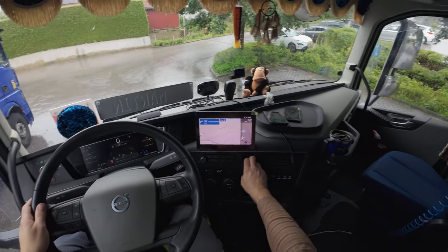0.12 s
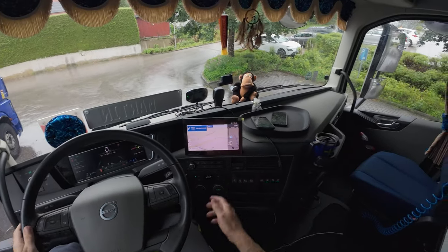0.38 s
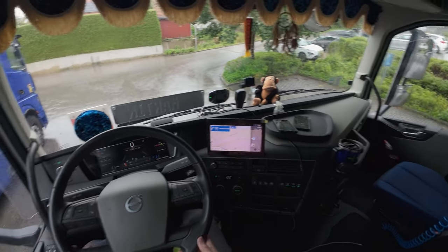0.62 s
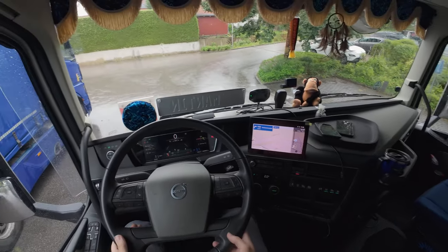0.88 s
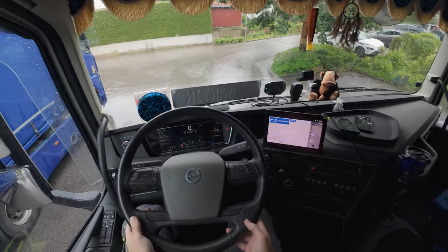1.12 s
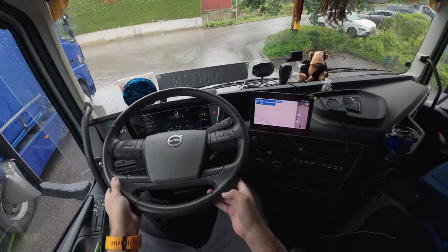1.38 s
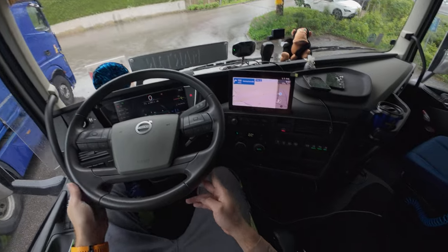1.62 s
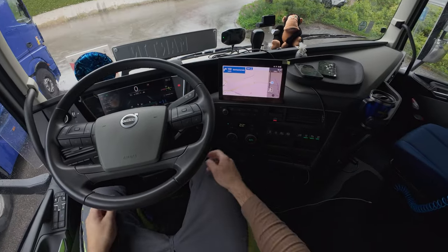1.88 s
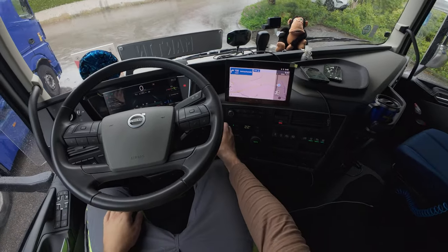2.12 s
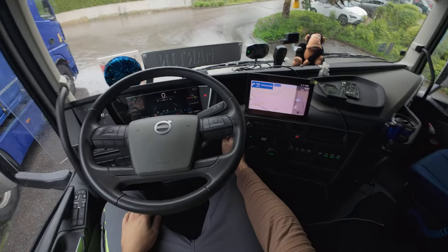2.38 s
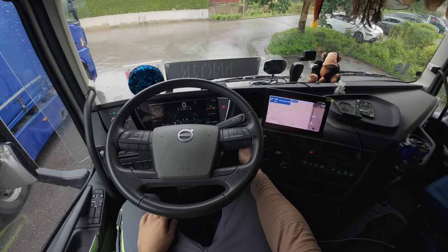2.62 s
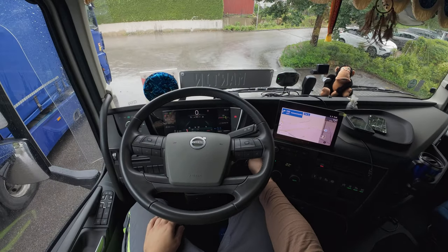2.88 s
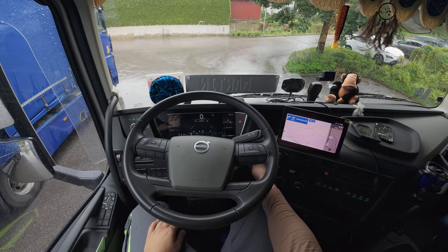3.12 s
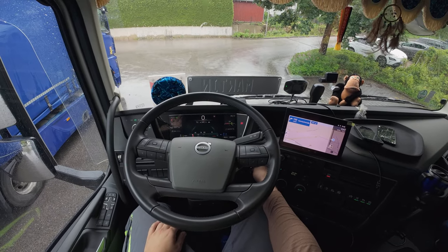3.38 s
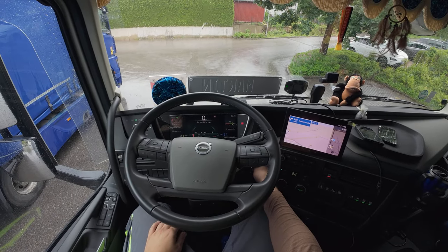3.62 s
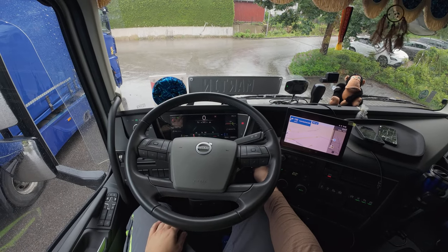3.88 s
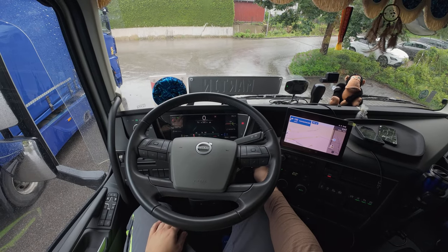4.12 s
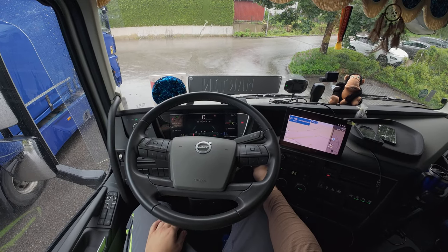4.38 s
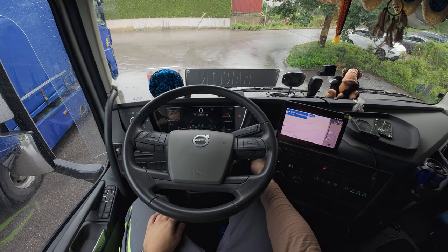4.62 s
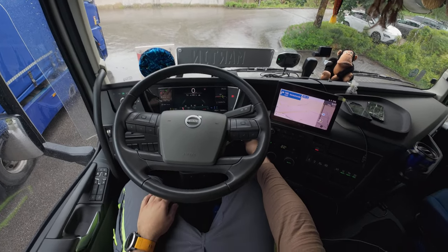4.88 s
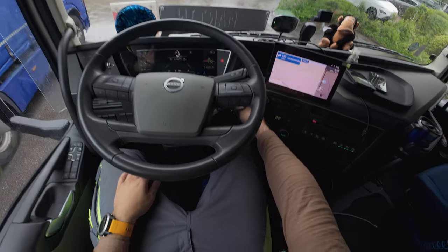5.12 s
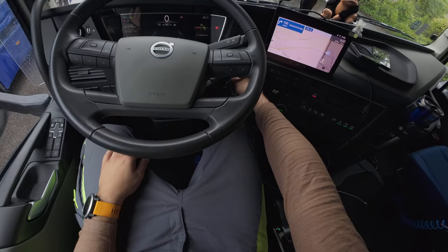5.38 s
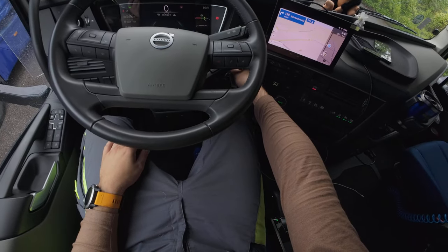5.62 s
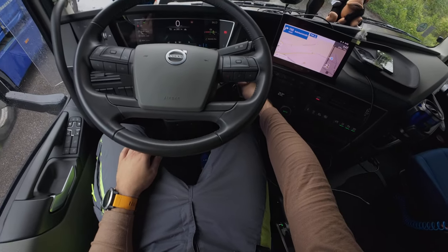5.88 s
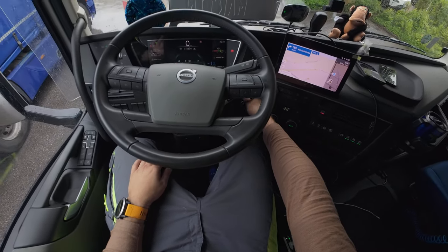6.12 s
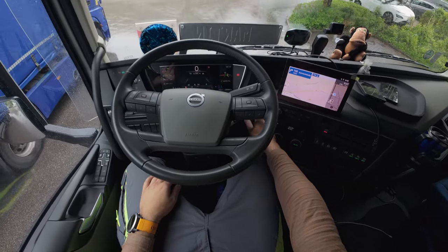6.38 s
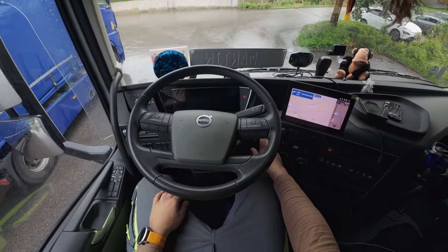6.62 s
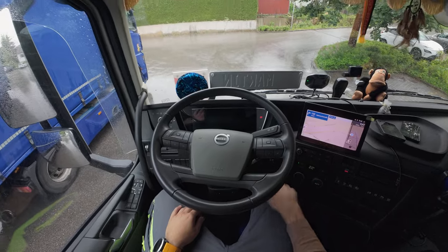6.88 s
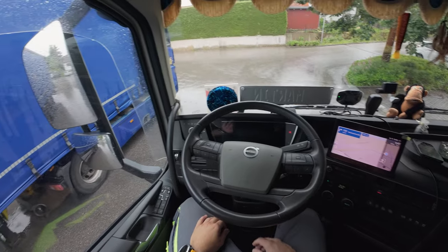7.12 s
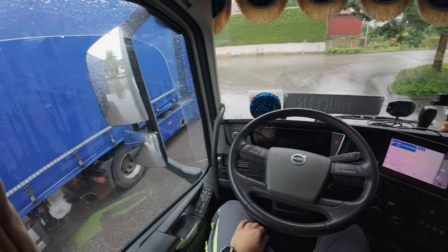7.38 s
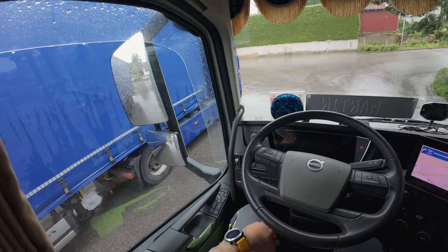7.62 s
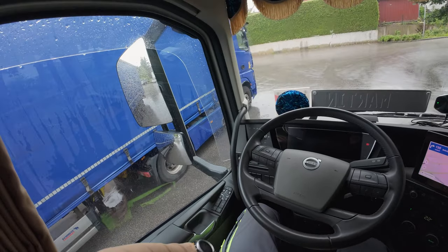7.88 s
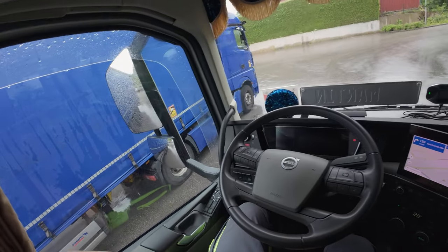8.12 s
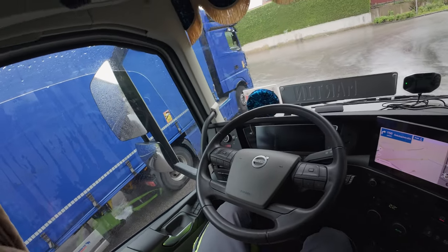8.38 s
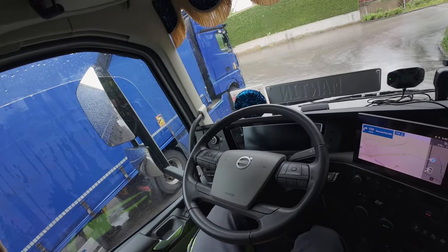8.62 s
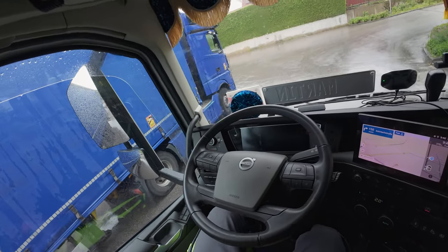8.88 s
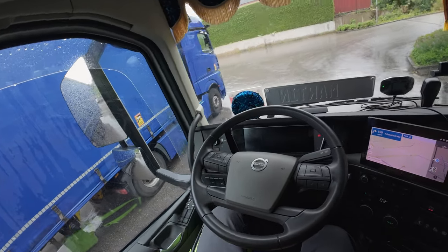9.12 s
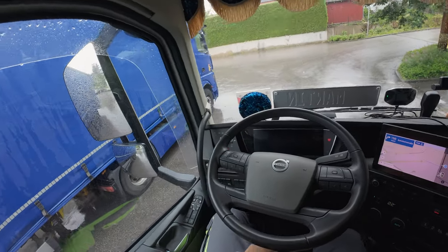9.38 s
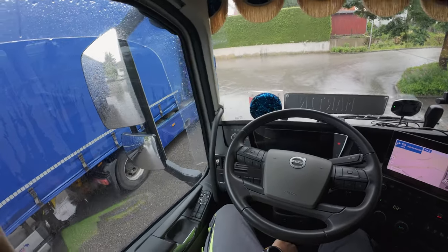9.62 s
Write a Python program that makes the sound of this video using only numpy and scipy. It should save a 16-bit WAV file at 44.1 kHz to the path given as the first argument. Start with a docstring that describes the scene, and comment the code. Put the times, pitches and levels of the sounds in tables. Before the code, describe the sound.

Heard in stereo at the driver's head inside a closed, dry truck cab. From 0 s a diesel drums at a slightly fast idle, low and muffled with soft clatter. Small plastic switch clicks come at 0.1 and 0.3 s. At 0.6 s a valve knocks and a bright air jet spits, hissing and fading until about 1.1 s, when a sharp puff starts a second hiss that thins out by about 2 s. Hard steering-column clacks ratchet between 1.15 and 1.65 s, with panel thuds. The engine settles to lower idle by 2 s and runs evenly, with a barely audible high whine. A crisp click lands at 6.1 s, tiny ones at 6.45. From 6.5 s the engine glides down, shaking the cab around 7 s, and stops near 8.4. Faint cloth rustles, low seat bumps and trim ticks follow, strongest near 8.7 s, then near silence.

```python
"""A fast diesel idle drums under a quiet truck cab, built from crank-order sines and shaped noise.
Switches click, air jets from a valve and the steering column ratchets, as noise and damped resonances.
The engine drops to idle; near 6.5 s it is switched off, its orders gliding down as it shudders to rest.
Cloth rustles as grainy noise and low lumps and seat bumps follow while the driver shifts in the seat.
Two ports near the driver's head hear each noise with frequency-dependent likeness, level and phase."""
import sys
import numpy as np
from scipy import signal
from scipy.io import wavfile
from scipy.ndimage import uniform_filter1d

SR = 44100
rng = np.random.default_rng(int(sys.argv[2]) if len(sys.argv) > 2 else 0)


def bounce(signal):
    """Save signal as a 16-bit WAV file at the path given by the first command-line argument."""
    frames = np.transpose(np.atleast_2d(signal))
    limited = np.clip(frames, -1, 1)
    pcm = np.round(limited * 32767).astype(np.int16)
    wavfile.write(sys.argv[1], SR, pcm)


def decibels_to_gain(level_db):
    """Convert a level in decibels to a linear amplitude gain (20 dB per decade)."""
    exponent = np.asarray(level_db, float) / 20
    return 10 ** exponent


N = 429958  # samples


def evened(x):
    """Normalization: scales a signal to rms 1."""
    return x / np.sqrt(np.mean(x ** 2) + 1e-20)


def read(points, hz):
    """Log-frequency interpolation of a spectrum table."""
    f, value = np.transpose(points)
    return np.interp(np.log(hz + 1), np.log(f + 1), value)


def curve(rows):
    """Linear interpolation in time: each table column, one value a sample."""
    s, *columns = np.transpose(rows)
    return [np.interp(np.arange(N) / SR, s, c) for c in columns]


def drift(rate_hz):
    """Random-phase superposition: slow sines up to rate_hz make a wandering of rms 1."""
    t = np.arange(0, N + 64, 64) / SR
    rates = rate_hz * np.geomspace(.05, 1, 16)
    waves = sum(np.sin(2 * np.pi * (f * t + rng.random())) / np.sqrt(f) for f in rates)
    return np.interp(np.arange(N) / SR, t, evened(waves))


def hump(peak_s, rise_s, fall_s):
    """Exponential growth and decay: gain 1 at the peak, 20 dB down after the rise or fall time."""
    t = np.arange(N) / SR - peak_s
    return decibels_to_gain(20 * np.where(t < 0, t / rise_s, -t / fall_s))


def resonate(x, hz, width):
    """Damped resonance: one complex pole, with gain about 1 at its centre."""
    pole = np.exp((2j * np.pi * hz - np.pi * width) / SR)
    return 2 * signal.lfilter([1 - abs(pole)], [1, -pole], x).real


# Likeness of the two ports in a diffuse field. Each row: frequency in Hz, left-right likeness from 0 to 1.
LIKENESS = [(60, 0.99), (600, 0.98), (1400, 0.91), (3000, 0.76), (7000, 0.26), (15000, 0.49)]
# Phase between the ports. Each row: frequency in Hz, lead of the left port in radians.
LEFT_LEAD = [(2500, 0), (5000, .35), (8000, 1.2), (11000, 2.2), (16000, 3.3)]
# Level between the ports. Each row: frequency in Hz, gain of the right port in dB.
RIGHT_GAIN = [(2000, 0), (6000, -1.5), (9000, 1.5), (16000, 5.5)]


def noise(tone, lo_hz, hi_hz, patchy_db, size=1024, peaks=(), diffuse=1):
    """Partial coherence: shaped stereo noise at two ports, its port mean about rms 1 within lo-hi."""
    hop = size // 4
    hz, frames = np.fft.rfftfreq(size, 1 / SR), N // hop + 5
    a, b, c, d, patches = rng.standard_normal((5, len(hz), frames))
    patches = uniform_filter1d(patches, size // 100, 0)
    patches = evened(uniform_filter1d(patches, 8, 1))
    # near sources reach both ports alike
    same = np.clip(1 - diffuse * (1 - read(LIKENESS, hz)), 0, 1)[:, None]
    left = a + 1j * b
    right = same * left + np.sqrt(1 - same ** 2) * (c + 1j * d)
    right *= (decibels_to_gain(read(RIGHT_GAIN, hz)) * np.exp(-1j * read(LEFT_LEAD, hz)))[:, None]
    bumps_db = sum(db / (1 + (2 * (hz - f) / w) ** 2) for f, w, db in peaks)
    gain = decibels_to_gain(read(tone, hz) + bumps_db)
    share = np.sum(gain[(hz >= lo_hz) & (hz <= hi_hz)] ** 2) / np.sum(gain ** 2)
    z = np.array([left, right]) * gain[:, None] * decibels_to_gain(patchy_db * patches)
    out = signal.istft(z, nperseg=size, noverlap=size - hop)[1][:, :N]
    return out / np.sqrt(np.mean(out.mean(0) ** 2) * share)


# Spectrum of the quiet cab. Each row: frequency in Hz, relative density in dB per Hz.
QUIET_CAB = [(18, -21), (30, 10.5), (38, -17), (112, -32.5), (328, -26), (394, -43), (486, -25.5),
             (600, -39), (889, -36), (988, -43), (3400, -64.5), (13300, -70), (16000, -64)]


def quiet_cab():
    """Steady background: stationary noise of a fixed mean spectrum."""
    return decibels_to_gain(-57.5) * noise(QUIET_CAB, 150, 1500, 2.3, size=2048)


# Peaks and hollows of the cab's panels and air. Each row: frequency in Hz, width in Hz, gain in dB.
CAB_MODES = [(392, 13, -6.5), (522.5, 92, 2), (704, 18, 0.5), (674, 73, 5), (872, 36, 8), (1028, 34, 8.5),
             (1090, 35, -3), (1161, 70, 4.5), (1303, 35, -7.5), (1296, 35, 13), (1402, 27, 6.5),
             (1585, 160, 5.5), (1885, 37, 7.5), (2030, 72, -9), (2350, 35, 5.5), (2390, 30, 0),
             (2590, 26, 8.5), (2654, 64, -8.5), (2784, 71, 8), (3000, 60, -3)]
# Spectrum of the engine clatter. Each row: frequency in Hz, relative density in dB per Hz.
CLATTER_TONE = [(12, -26), (20, -4.5), (34, -2), (54, -8), (80, -1.5), (108, -22.5), (185, -19.5),
                (221, -27), (293, -26), (398, -31.5), (514, -29.5), (754, -41), (1390, -47.5),
                (2100, -54.5), (9000, -83), (11700, -123), (19800, -120)]


def rattle(turns):
    """Impulsive excitation of modes: valve-gear ticks twice a firing, a chance few ringing one panel."""
    at = np.flatnonzero(np.diff(np.floor(2 * turns)))
    panels = [(hz, w) for hz, w, db in CAB_MODES if db > 0]
    sizes = decibels_to_gain(6 * np.minimum(rng.exponential(1, (len(at), len(panels))), 3.5))
    out = np.zeros(N)
    for size, (hz, w) in zip(sizes.T, panels):
        ticks = np.zeros(N)
        ticks[at] = size
        ring = evened(resonate(resonate(ticks, hz, 0.37 * w), hz, 3 * w))
        level_db = read(CLATTER_TONE, hz) - read(CLATTER_TONE, 667)
        out += decibels_to_gain(level_db) * np.sqrt(w / 40) * ring
    return out


# Fast idle, idle, then the run-down. Each row: time in seconds, firing rate in Hz.
FIRING_RATE = [(0, 30.2), (1.3, 30.2), (1.6, 28.9), (1.9, 27.75), (2.1, 27.6), (6.5, 27.6), (6.8, 25.2),
               (7.0, 21.4), (7.2, 18.3), (7.6, 14), (8.0, 11), (8.4, 9)]
# How hard the firing shakes the cab; it peaks where the run-down crosses the bounce of the mounts.
# Each row: time in seconds, level in dB rms.
FIRING_THROB = [(0, -27), (.4, -32), (.7, -23.5), (.92, -30), (1.08, -41.5), (1.3, -25), (1.52, -28),
                (1.75, -25.5), (1.9, -41), (2.15, -35.5), (2.35, -28.5), (6.4, -29), (6.54, -33.5),
                (6.7, -25), (6.86, -32), (7.0, -17.5), (7.2, -23), (7.35, -37.5), (7.47, -27), (7.6, -48),
                (7.9, -31.5), (8.1, -38.5), (8.4, -63)]
# Tones of the uneven cylinders. Each row: half-order of the crank (six to a firing),
# level in dB against the clatter, or against its idle level where that is lower.
HALF_ORDERS = [(2, -5.5), (3, -2), (7, -20), (9, 0), (10, -5), (13, -11.5), (14, -4), (15, 0), (17, -8.5),
               (20, -21), (24, -18.5), (27, -16.5), (30, -15)]
# Tones of the belt-driven pump. Each row: multiple of the pump rate, level in dB referred likewise.
PUMP_ORDERS = [(1, -5), (3, -5.5), (5, -8.5), (6, -8.5), (7, -29), (8, -25)]


def engine():
    """Order analysis: wavering sines locked to the crank, with clatter modulated twice a firing."""
    cylinders, pump_ratio = 6, .874  # half-orders a firing; pump rate per firing rate
    idle_hz, idle_throb_db, idle_clatter_db = 27.6, -29, -44
    stop_s = 8.4
    (first_db,), (speed_hz,) = curve(FIRING_THROB), curve(FIRING_RATE)
    extra_db = np.maximum(first_db - idle_throb_db, -8)
    # the slower the crank, the sharper each compression
    lumpy_db = .6 * np.maximum(idle_hz - speed_hz, 0)
    fast_db = 0.56 * np.maximum(speed_hz - idle_hz, 0)
    stall_loss_db = 10.5 / (1 + np.exp((speed_hz - 17.3) / 1.5))  # once the crank is too slow
    clatter_db = idle_clatter_db + fast_db - stall_loss_db
    tone_db = np.minimum(clatter_db, idle_clatter_db)
    turns = np.cumsum(speed_hz) / SR  # in firings
    running = np.clip((stop_s - np.arange(N) / SR) / .15, 0, 1)
    # multiple of the firing rate, level in dB, waver in dB
    orders = [(1, first_db, .3),
              (2, -43 + .9 * extra_db + lumpy_db, 1.5),
              (3, -42 + .8 * extra_db + lumpy_db, 0.78)]
    orders += [(k / cylinders, tone_db + db, .8) for k, db in HALF_ORDERS]
    orders += [(k * pump_ratio, tone_db + db, .8) for k, db in PUMP_ORDERS]
    tones = np.zeros(N)
    for k, db, waver_db in orders:
        phase = k * turns + rng.random() + 0.0099 * drift(3)
        tones += decibels_to_gain(db + waver_db * drift(5.1)) * np.sin(2 * np.pi * phase)
    beat = 1 + .2 * np.cos(4 * np.pi * turns) + .06 * np.cos(2 * np.pi * turns + 1.1)
    body = [(f, db - 9 * (f < 100)) for f, db in CLATTER_TONE]  # the tones carry most of the bass
    body_noise = noise(body, 150, 1800, 0.64, size=4096, peaks=CAB_MODES)
    clatter = decibels_to_gain(clatter_db + 1.6 * drift(25)) * beat * body_noise
    return running * (np.sqrt(2) * tones + clatter + decibels_to_gain(clatter_db - 23.0) * rattle(turns))


# Single low pushes, stronger at the left port. Each row: centre in seconds, relative level in dB.
PRESSURE_JOLTS = [(.3, -28), (2.44, -35), (5.46, -37.5), (6.08, -34.5), (7.2, -41), (7.68, -31.5),
                  (8.2, -32), (8.4, -35), (8.9, -29), (9.13, -33.5), (9.43, -33)]


def sway():
    """Infrasonic pressure: narrowband lumps and Gaussian wave packets, stronger at the left port."""
    sway_hz, jolt_s, lumps_left_db, jolt_left_db = 12.4, 0.17, 16.5, 22.5
    t = np.arange(N) / SR
    level_db = np.interp(t, [7.4, 8.4], [-45, -51.5]) + 4 * drift(4)
    lumps = evened(resonate(resonate(rng.standard_normal(N), sway_hz, 9), sway_hz, 9))
    jolts = np.zeros(N)
    for s, db in PRESSURE_JOLTS:
        packet = np.exp(-(2 * (t - s) / jolt_s) ** 2) * np.cos(2 * np.pi * sway_hz * (t - s))
        jolts += decibels_to_gain(db) * packet
    lump_gain = decibels_to_gain(level_db + lumps_left_db * np.array([[.5], [-.5]]))
    return lumps * lump_gain - 2 * jolts * decibels_to_gain([[0], [-jolt_left_db]])


# Ringing blips, high squeaks and low seat bumps.
# Each row: start in seconds, length in seconds, frequency in Hz, peak level in dB.
BLIPS = [(0.029, 0.029, 6240, -53), (0.716, 0.058, 330, -18.5), (1.216, 0.033, 11500, -27),
         (1.441, 0.026, 1850, -34.5), (2.931, 0.065, 300, -33.5), (6.424, 0.03, 3900, -48),
         (6.426, 0.021, 6300, -56), (6.464, 0.0089, 1925, -45), (6.464, 0.025, 3000, -51),
         (7.861, 0.033, 330, -41), (7.98, 0.023, 6000, -60), (8.134, 0.024, 280, -40),
         (8.241, 0.018, 280, -40), (8.352, 0.024, 380, -40), (8.4, 0.042, 280, -40),
         (8.456, 0.033, 3110, -62), (8.691, 0.031, 1710, -46), (8.799, 0.01, 1700, -47)]
# Faint electrical whine. Each row: frequency in Hz, relative level in dB.
WHINE_TONES = [(13200, -97), (13582, -98), (14018, -104)]


def squeaks():
    """Phase-modulated sines: brief near-pure blips, and a wavering whine while the dash is lit."""
    out, t = np.zeros((2, N)), np.arange(N) / SR
    for s, length, hz, db in BLIPS:
        swell = np.sin(np.pi * np.clip((t - s) / length, 0, 1))
        port_lag = np.array([[0], [read(LEFT_LEAD, hz)]])
        out += decibels_to_gain(db) * swell * np.sin(2 * np.pi * hz * t + 1.9 * drift(300) - port_lag)
    whine = np.zeros(N)
    for hz, db in WHINE_TONES:
        whine += decibels_to_gain(db + 8.0 + 2.5 * drift(20)) * np.sin(2 * np.pi * hz * t + 1.5 * drift(20))
    return out + whine * (t < 6.45) * np.array([[.6], [1.4]])


# Knocks of switches and key, of the steering column, with the crack of one air puff at 1.128 s,
# and of the trim. Each row: start in seconds, then relative levels in dB of the snap,
# the dull ring, the treble crack and the thud.
SWITCH_KNOCKS = [(0.0916, -25.5, -37, -49, -41), (0.1398, -33.5, -34.5, -45, -28),
                 (0.2782, -25.5, -29.5, -29, -37.5), (0.3187, -35, -42.5, -45, -37.5),
                 (6.089, -41.5, -34.5, -51, -26), (6.1056, -19.5, -30, -19.5, -28.5),
                 (6.4271, -35, -57, -50, -41), (6.459, -37.5, -61, -45, -37.5)]
COLUMN_KNOCKS = [(0.6489, -18, -17, -42, -18.5), (0.6803, -19.5, -18, -45.5, -18.5),
                 (0.7345, -26, -29, -41.5, -23.5), (0.751, -23.5, -27, -36, -24),
                 (0.7696, -33, -37.5, -44.5, -19.5), (1.128, -35, -49, -25.5, -50),
                 (1.1533, -27.5, -25.5, -40, -30), (1.1818, -14, -20.5, -27.5, -32.5),
                 (1.2494, -12, -14, -41, -12.5), (1.2947, -8.5, -17.5, -32, -16),
                 (1.3431, -10, -19.5, -43.5, -13.5), (1.4016, -14.5, -20.5, -29.5, -22.5),
                 (1.4144, -26, -38.5, -51.5, -13.5), (1.5479, -24, -34.5, -47, -23.5),
                 (1.5998, -37.5, -39, -50, -31), (1.6422, -32.5, -35, -41, -22.5),
                 (2.067, -58, -38.5, -78, -42), (2.384, -51, -38, -78, -44)]
TRIM_KNOCKS = [(7.1611, -40.5, -35, -54, -28), (7.237, -59, -54, -64, -45), (7.284, -40.5, -29, -58, -28),
               (7.3418, -69, -37, -76, -25.5), (7.9654, -57, -36, -75, -39), (8.0849, -58, -42, -65, -29),
               (8.1867, -53, -66, -60, -45), (8.2785, -33.5, -30, -57, -45), (8.2942, -31, -56, -53, -39),
               (8.3444, -42.5, -61, -57, -55), (8.4016, -45.5, -65, -78, -43), (8.807, -32, -66, -43, -45),
               (9.2419, -58, -45, -64, -60)]
# What each part rings with. Each row: frequency in Hz, width in Hz, relative level in dB.
SWITCH_MODES = [(1384, 96, 1.5), (2263, 110, -2), (2960, 63, -12.5)]
COLUMN_MODES = [(1151, 250, 0.5), (1803, 250, -4.5), (2940, 500, -1.5), (4300, 1300, -10)]
TRIM_MODES = [(1080, 180, 1), (1700, 120, 0), (2430, 140, -3), (3070, 300, -2)]
# Thud of dash and column. Each row: frequency in Hz, relative level in dB, 60 dB decay time in seconds.
PANEL_MODES = [(83.16, 3.5, 0.45), (137, 6.5, 0.18), (175.7, -0.5, 0.26), (285.6, -9, 0.27)]
# Dull ring of all the knocks. Each row: frequency in Hz, width in Hz, relative level in dB.
DULL_MODES = [(310, 330, -4.5), (453, 220, -1), (577, 57, -3.5), (697, 42, -1.5)]


def knocks():
    """Impact excitation: ragged bursts drive plastic rings, a bright crack and a panel thud."""
    dull, sharp, crack, thud, part = np.zeros((5, N))
    t, ragged = np.arange(SR // 4) / SR, decibels_to_gain(0.86 * drift(900))
    white = ragged * rng.standard_normal(N)
    rise = 1 - np.exp(-t / .0008)
    # knocks, modes, ring level in dB, 60 dB decay time in seconds
    parts = [(COLUMN_KNOCKS, COLUMN_MODES, -22, 0.06),
             (SWITCH_KNOCKS, SWITCH_MODES, -21.5, 0.098),
             (TRIM_KNOCKS, TRIM_MODES, -15, 0.038)]
    for rows, modes, ring_db, t60 in parts:
        struck = np.zeros(N)
        cab_answer = decibels_to_gain(-21 - 60 * t / 0.23)
        burst = rise * (decibels_to_gain(-60 * t / 0.0034) + decibels_to_gain(-60 * t / t60) + cab_answer)
        dull_decay = decibels_to_gain(1.0 - 60 * t / (1.81 * t60)) * (1 - np.exp(-t / 0.0043))
        crack_decay = decibels_to_gain(-6.0) * rise * (decibels_to_gain(-60 * t / (0.6 * t60)) + 1.4 * decibels_to_gain(-60 * t / 0.012))
        for s, snap_db, dull_db, treble_db, thud_db in rows:
            at = slice(round(s * SR), round(s * SR) + len(t))
            struck[at] += decibels_to_gain(snap_db) * burst
            dull[at] += decibels_to_gain(dull_db) * dull_decay
            crack[at] += decibels_to_gain(treble_db) * crack_decay
            # thud counts only above a threshold; quieter knocks get none
            thud[at] += max(decibels_to_gain(thud_db) - decibels_to_gain(-37.0), 0) * np.exp(-t / 0.00075)
        sharp += struck
        for hz, w, db in modes:
            ring = resonate(resonate(struck * white, hz, w), hz, 2 * w)
            part += decibels_to_gain(ring_db + db) * np.sqrt(SR / w) * ring
    long = np.arange(SR) / SR
    panel = sum(decibels_to_gain(db - 60 * long / t60) * np.sin(2 * np.pi * hz * long) for hz, db, t60 in PANEL_MODES)
    boom = decibels_to_gain(-37.0) * signal.oaconvolve(thud, panel)[:N]
    dull_ring = evened(sum(decibels_to_gain(db) * resonate(resonate(white, hz, w), hz, 3 * w) for hz, w, db in DULL_MODES))
    middle_tone = [(500, -33), (1100, -1), (3200, 2), (5500, -9), (9000, -32.5)]
    bright_tone = [(2500, -33.5), (3800, 3.5), (7000, -5.0), (10000, -3.5), (12000, -10.5),
                   (13300, -6), (16000, -13.0)]
    middle = noise(middle_tone, 900, 5300, 3.5, size=256, peaks=CAB_MODES, diffuse=.2)
    bright = noise(bright_tone, 4500, 18000, 3.0, size=256)
    bursts = ragged * (decibels_to_gain(-11.5) * sharp * middle + crack * bright)
    return bursts + dull * dull_ring + boom + part * decibels_to_gain([[-1.2], [1.2]])


# Spectrum of the air jet. Each row: frequency in Hz, relative density in dB per Hz.
JET_TONE = [(180, -37.5), (300, -6.5), (455, -2), (713, -5.5), (930, -11.5), (2880, -14.5), (3580, -12.5),
            (3890, -12.5), (4300, -13), (6200, -13.5), (7080, -18), (10400, -8.5), (12100, -14),
            (13300, -3), (16000, -16.5)]
# Valve spits. Each row: start in seconds, level in dB, 60 dB decay time in seconds.
VALVE_PUFFS = [(.298, -55, .04), (.318, -57, 0.046), (0.612, -35, 0.19), (1.127, -30.5, 0.099),
               (1.178, -37.5, 0.033)]
# The valve stands open and pressure runs down. Each row: opening time in seconds, rise in seconds,
# level in dB, time to empty in seconds, shutting time in seconds.
VALVE_VENTS = [(.35, 0.67, -58.5, 1.1, .62), (.722, 0.014, -36, 0.6, 1.125), (1.225, 0.093, -34, 0.71, 2.2)]


def air():
    """Turbulent jet noise: its strength is a power of the pressure left behind the valve."""
    puff_rise_s, shut_s, jet_power = 0.0094, 0.0095, 1.43
    t = np.arange(N) / SR
    level = decibels_to_gain(-75) * np.clip((2.188 - t) / 0.17, 0, 1)  # seep
    for s, db, t60 in VALVE_PUFFS:
        decay = decibels_to_gain(db - 60 * np.maximum(t - s - puff_rise_s, 0) / t60)
        level += decay * np.clip((t - s) / puff_rise_s, 0, 1)
    for opens, rise, db, empty, shuts in VALVE_VENTS:
        pressure = np.clip(1 - (t - opens - rise) / empty, 0, 1)
        opening = np.clip((t - opens) / rise, 0, 1)
        closing = np.clip(1 - (t - shuts) / shut_s, 0, 1)
        level += decibels_to_gain(db) * opening * pressure ** jet_power * closing
    return level * decibels_to_gain(0.44 * drift(40)) * noise(JET_TONE, 5000, 21000, 1.8, size=256, diffuse=0.69)


# Spectra of the bright and the dull part. Each row: frequency in Hz, relative density in dB per Hz.
CLOTH_TONE = [(1180, -39.5), (2000, -5.5), (2420, -5), (3710, -8.5), (4260, -10.5), (4900, -9.5),
              (6310, -14.5), (7060, -23.5), (8050, -16), (11100, -21), (13100, -14), (13900, -10.5),
              (16000, -31)]
SEAT_TONE = [(150, -56), (250, -20), (371, -26), (413, -2.5), (572, -6), (918, -6.5), (1080, -12),
             (1360, -12.5), (1590, -20), (1930, -20.5), (2500, -30.5), (3250, -53), (5500, -120)]
# Strokes of clothes on the seat. Each row: peak in seconds, rise in seconds, fall in seconds,
# level in dB, relative extra level of the dull part in dB.
CLOTH_STROKES = [(6.87, .2, 0.68, -74, 10), (7.17, 0.033, .06, -66, 31), (7.28, 0.16, 0.095, -69, 31),
                 (7.74, 0.4, 0.17, -64.5, -6), (7.98, 0.05, 0.13, -67.5, 31), (8.13, 0.091, 0.051, -64, 14),
                 (8.21, 0.057, 0.046, -71, -5), (8.32, 0.12, .3, -70.5, 27), (8.69, 0.24, .3, -54.5, 19),
                 (8.809, 0.011, .02, -56, 1.5), (9.25, 0.039, 0.43, -68.5, 20.5),
                 (9.31, 0.14, 0.32, -72.5, 32), (9.72, 0.34, .3, -84, -3)]


def rustle():
    """Friction noise: cloth drags in grainy strokes over faint fidgeting, each with its dull share."""
    arm_rest_s = 8.83
    t = np.arange(N) / SR
    light = decibels_to_gain(-79.5) * np.clip((t - 6.75) / 0.14, 0, 1)  # fidgeting
    heavy = light * decibels_to_gain(7)
    for s, rise, fall, db, dull_db in CLOTH_STROKES:
        stroke = decibels_to_gain(db) * hump(s, rise, fall)
        if s < arm_rest_s:  # the arm comes to rest
            stroke *= np.clip(1 - (t - arm_rest_s) / 0.054, 0, 1)
        light = light + stroke
        heavy = heavy + decibels_to_gain(dull_db) * stroke
    bright = noise(CLOTH_TONE, 2300, 15500, 1.9, size=512)
    dull = decibels_to_gain(-14.5) * noise(SEAT_TONE, 500, 2000, 1.7, size=1024)
    return decibels_to_gain(0.96 * drift(150)) * (light * bright + heavy * dull)


# Low lumps as the block settles on its mounts and the seat gives.
# Each row: peak in seconds, rise in seconds, fall in seconds, relative level in dB.
SETTLING_LUMPS = [(7.32, 0.13, 2.1, -35.5), (7.95, 0.99, 0.52, -36.5), (8.12, 0.13, 0.17, -35),
                  (8.29, 0.07, 0.061, -33.5), (8.55, .5, 0.24, -47.5), (8.75, 0.051, 0.18, -34),
                  (9.3, 1.5, 1.5, -65), (9.62, 0.11, 0.13, -50)]


def settle():
    """Amplitude-modulated low noise: a broken shudder in swelling and decaying lumps."""
    tone = [(25, -15.5), (50, 10.0), (85, 7.5), (115, -13), (170, -4), (300, -6), (600, -31.5), (900, -61)]
    level = sum(decibels_to_gain(db) * hump(s, rise, fall) for s, rise, fall, db in SETTLING_LUMPS)
    return level * decibels_to_gain(-7 + 2.1 * drift(30)) * noise(tone, 45, 250, 2.2, size=2048)


def scene():
    """Linear superposition of all sources over the quiet cab."""
    return quiet_cab() + engine() + sway() + squeaks() + knocks() + air() + rustle() + settle()


def band_limit(x):
    """A steep low-pass at the top of the band."""
    return signal.sosfilt(signal.butter(12, 16350, fs=SR, output="sos"), x)


def record(dry):
    """Band limiting: a linear-phase low-pass at 15850 Hz finishes the mix."""
    lowpass = signal.firwin(255, 15850, window=("kaiser", 9), fs=SR)
    limited = signal.oaconvolve(dry, lowpass[None], "same")
    return band_limit(limited)


dry = scene()
out = record(dry)
bounce(out)
```